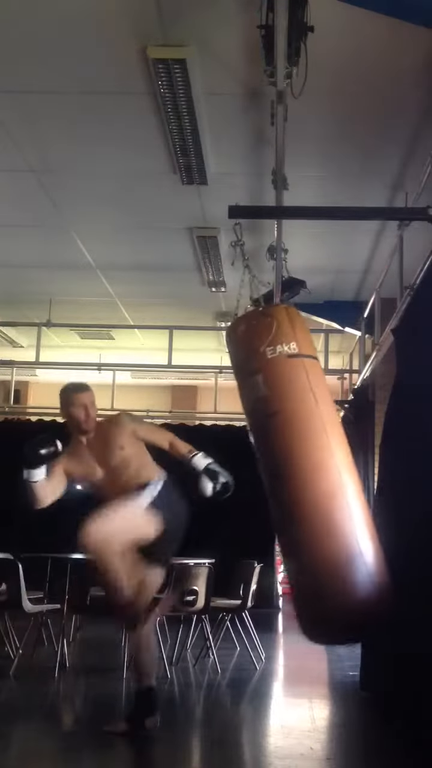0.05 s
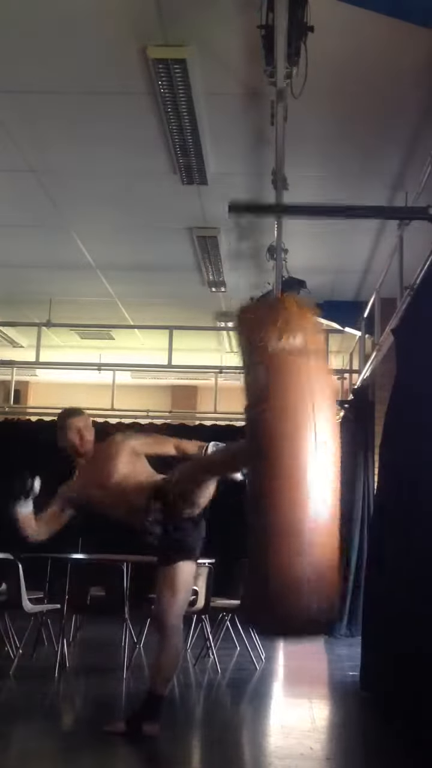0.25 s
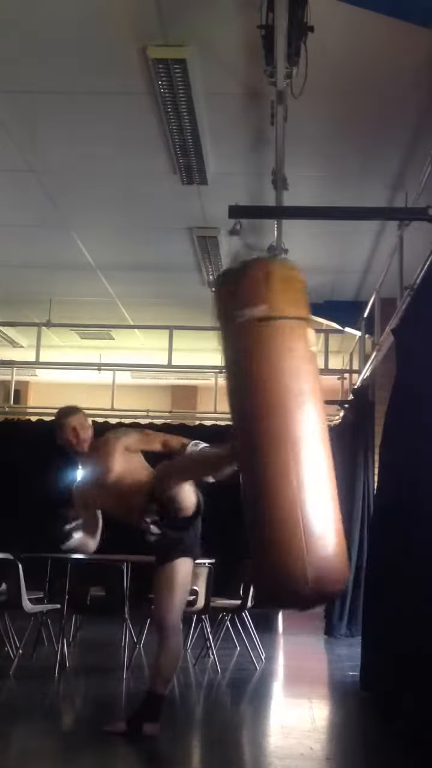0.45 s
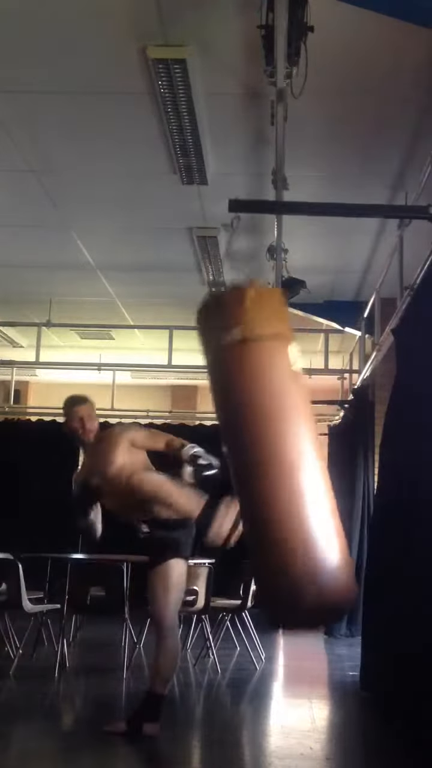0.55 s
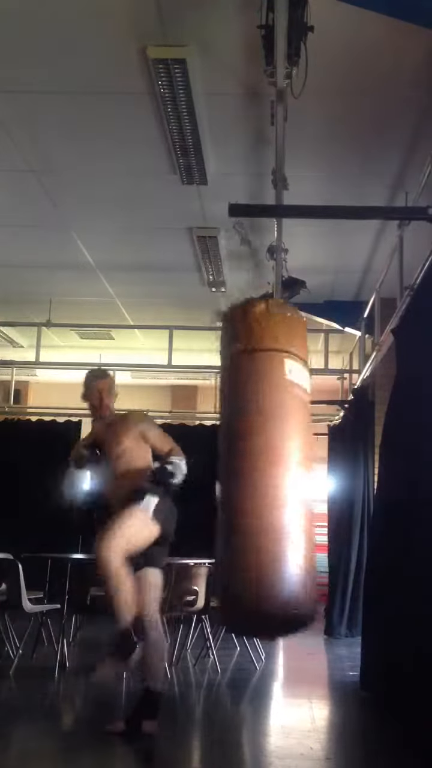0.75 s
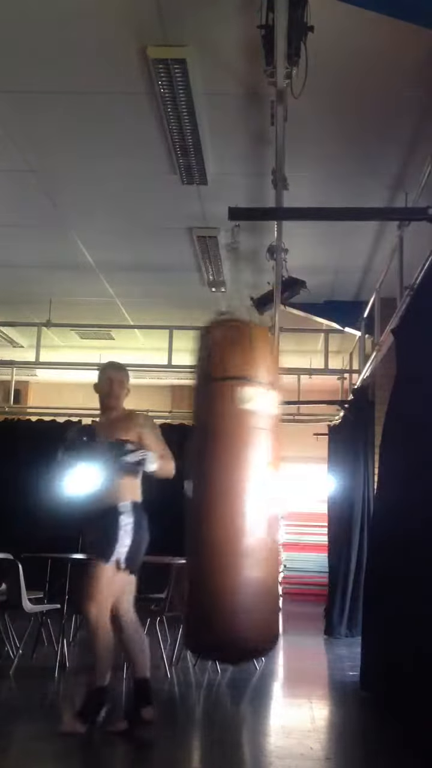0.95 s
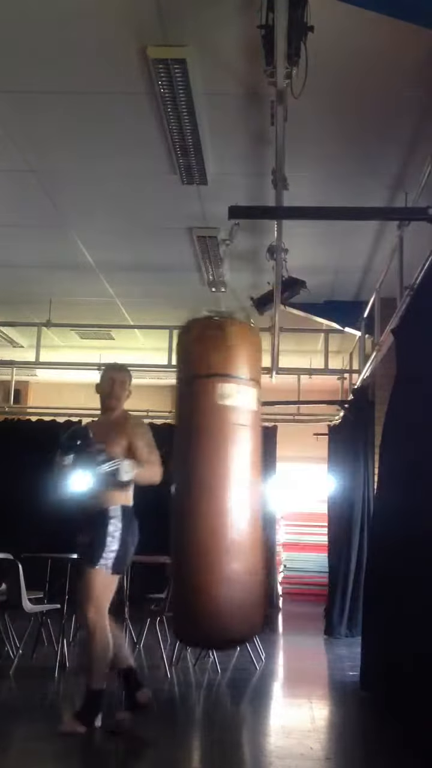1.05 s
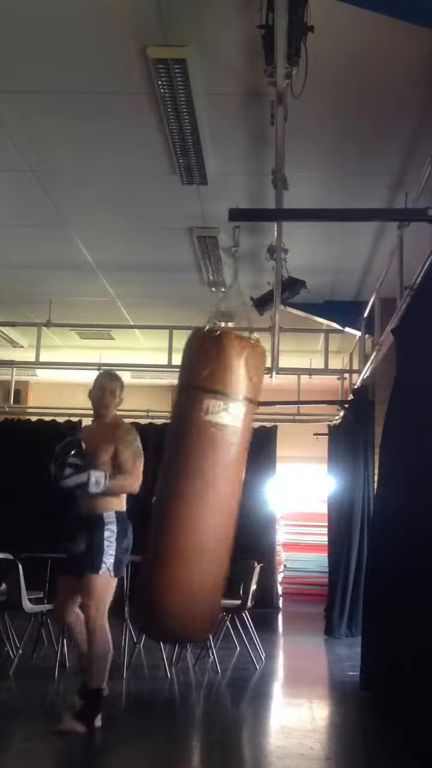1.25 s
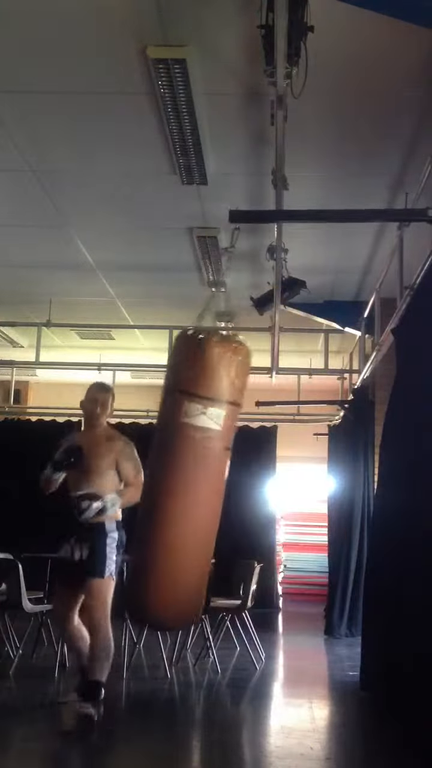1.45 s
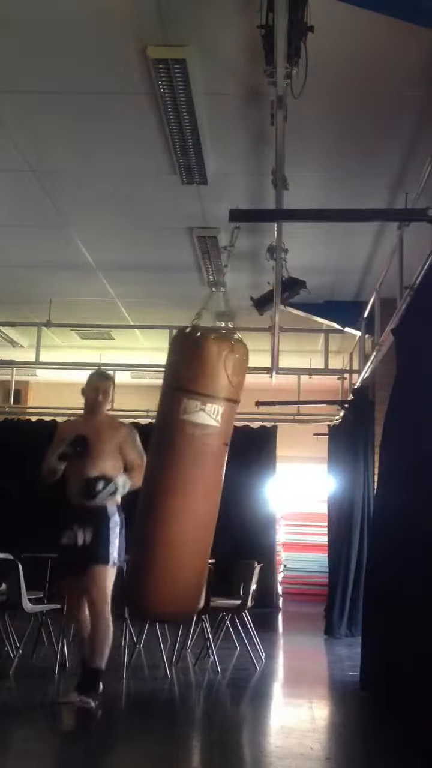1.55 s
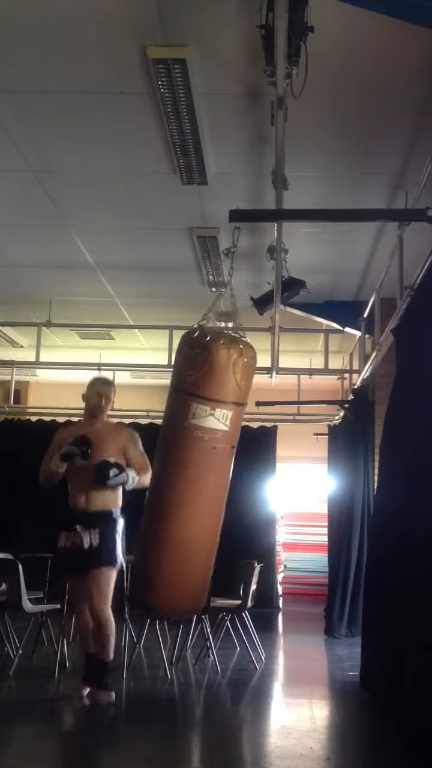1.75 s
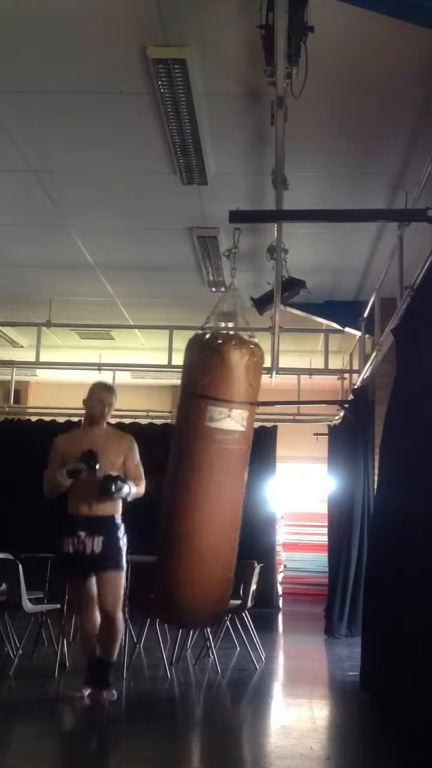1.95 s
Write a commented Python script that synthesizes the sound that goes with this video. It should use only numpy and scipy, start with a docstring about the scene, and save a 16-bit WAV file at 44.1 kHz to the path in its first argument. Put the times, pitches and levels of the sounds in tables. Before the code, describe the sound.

A heavy punching bag is kicked once at about 0.2 seconds, a leather slap with a short, low boom. Its chain clashes brightly right after, and again around 0.6 seconds with dull tugs as the bag drops back. Weaker rattles, ringing links and faint swivel squeaks follow until about 2 seconds. A low ventilation hum runs underneath in the large, quiet hall.

```python
"""One kick on a heavy bag

In a large, quiet hall with a low ventilation hum, a shin slaps the leather and the hanging bag booms.
The bag jumps and drops back onto its mount: the straps tug, the chain clashes and links snap taut.
As it swings on, the chain jerks more and more weakly, loose links ring and the swivel squeaks.
Slap, tugs and clashes are dense ticks, filtered; boom and rings are dying sines; squeaks are narrow noise."""
import sys
import numpy as np
from scipy import signal
from scipy.fft import rfft, irfft
from scipy.io import wavfile
from scipy.ndimage import uniform_filter1d

SR = 44100
rng = np.random.default_rng(int(sys.argv[2]) if len(sys.argv) > 2 else 0)


def persist_wave(psi):
    """Save psi, clipped to +-1, as 16-bit WAV."""
    counts = np.round(np.clip(psi, -1, 1) * 32767).astype(np.int16)
    wavfile.write(sys.argv[1], SR, np.atleast_2d(counts).T)


N = 88200
T = np.arange(N) / SR

# EQ curves for the air, the shin on leather, the straps, the chain's clash and jingle, and the mount.
# Each row: frequency in Hz, relative gain in dB.
AIR_EQ = [(25, -44), (55, -52), (85, -21), (125, -4), (170, -4.5), (215, -5.5), (330, -6.5), (500, -9.5),
          (700, -19), (1500, -26), (4000, -25), (8000, -24), (15000, -31.5)]
SLAP_EQ = [(25, 4), (70, -22), (150, 1), (280, 0), (480, 1.5), (700, -2), (1300, -9), (2000, -15),
           (4000, -12.5), (8000, -21), (15000, -27)]
STRAP_EQ = [(45, -52), (100, -31), (150, 2.5), (230, 4), (450, 0), (620, -8), (1200, -12.5), (4000, -63)]
CLASH_EQ = [(60, -83), (300, -29), (1500, -37.5), (2200, -10), (2800, -1), (3500, -6), (4300, 2), (5100, 2),
            (6200, -2.5), (8200, -2.5), (9500, -6.5), (12000, -15.5), (15000, -5)]
JINGLE_EQ = [(100, -38), (2000, -15.5), (6000, -36), (8000, -2), (9400, -12), (11200, 7.5), (12800, 5),
             (13800, -17), (14550, 9.5), (15100, 3)]
MOUNT_EQ = [(50, -42), (120, -9), (250, -2.5), (450, 2), (800, -4.5), (1150, -0.5), (1550, -6),
            (2100, -3.5), (4000, -4.5), (10000, -45)]
# Resonances of the bag, the swivel hook and the links.
# Each row: pitch in Hz, relative level in dB, seconds to fall 60 dB.
BAG_MODES = [(156.8, -26, 0.64), (249, -46, 0.11), (446, -32, 0.09), (640, -31, .07)]
HOOK_MODES = [(1850, -13, .15), (2853, -7, .5), (3914, -5, .17), (4237, -1.5, .32), (4325, 1.5, .2),
              (4560, 1, .2), (4660, -3, .26), (4775, 2, .13), (4900, 1, .19), (5340, -8, .4),
              (5660, -5, .1), (6500, -6, .12)]
LINK_MODES = [(8595, -1, .16), (9972, -4, .22), (10950, 0, .12), (11050, 0, .06), (11515, -.5, .3),
              (14555, 4, .24), (14610, 0, .08)]
# Jerks of the chain. Each row: start and hold in seconds, then clash, jingle and mount knock in dB.
CHAIN_JERKS = [(0.241, 0.035, -30, -35, -51), (0.275, 0.032, -19, -26.5, -33),
               (0.304, 0.011, -16.5, -24, -30), (0.321, 0.021, -38, -19, -38), (0.365, 0.06, -39, -37, -39),
               (0.433, 0.16, -58, -54, -45.5),          (0.544, 0.015, -37.5, -38, -41),
               (0.563, 0.024, -32, -34, -39.5), (0.592, 0.014, -27, -44, -37.5),
               (0.615, 0.029, -32.5, -32, -46), (0.649, 0.0097, -20.5, -43, -35),
               (0.662, 0.02, -19, -30, -34.5), (0.703, 0.005, -31, -23, -29.5),
               (0.728, 0.015, -28, -27, -38), (0.766, 0.11, -47.5, -37, -87),
               (0.91, 0.034, -36.5, -32.5, -50), (0.942, 0.025, -32.5, -30.5, -38),
               (0.985, 0.034, -42.5, -59, -44), (1.063, 0.014, -47, -38, -52.5),
               (1.196, 0.021, -37.5, -38, -43), (1.212, 0.027, -33.5, -32.5, -40),
               (1.249, 0.035, -31, -29.5, -41.5), (1.356, 0.065, -48, -47, -54.5),
               (1.429, 0.0098, -44, -34, -44), (1.445, 0.022, -33, -64, -40),
               (1.514, 0.0084, -30, -43, -37.5), (1.535, 0.016, -39, -43, -44),
               (1.614, 0.034, -45.5, -55, -52), (1.659, 0.017, -39, -52, -48),
               (1.715, 0.073, -47, -58.5, -48.5), (1.853, 0.017, -38.5, -50, -46.5),
               (1.873, 0.091, -48, -80, -52), (1.95, 0.0039, -41, -45, -45.5),
               (1.979, 0.032, -47.5, -62, -51)]
# The bag lands in its straps. Each row: start in seconds, hold in seconds, level in dB.
STRAP_TUGS = [(0.249, 0.019, -34.5), (0.322, 0.031, -38.5), (0.567, 0.043, -34), (0.621, 0.052, -36),
              (0.906, 0.123, -45.5), (1.223, 0.076, -47)]
# Two links snap taut. Each row: start in seconds, level in dB.
LINK_SNAPS = [(0.2533, -27), (0.2765, -18), (0.2865, -15.5), (0.6, -25), (0.667, -17), (1.267, -27),
              (1.517, -36), (1.947, -33)]
# Links swinging free. Each row: start in seconds, pitch in Hz, level in dB, seconds to fall 60 dB.
LINK_CLINKS = [(0.267, 2745, -15.5, 0.052), (.276, 4830, -10, 0.061), (.284, 4300, -16.5, 0.15),
               (0.287, 4060, -16, 0.1), (0.307, 11450, -29.5, 0.55), (0.288, 14555, -31, 0.36),
               (0.395, 14555, -31, 0.42), (0.423, 8530, -34, 0.43), (0.566, 14500, -28, 0.8),
               (.65, 4950, -10.5, 0.071), (0.659, 7187, -18, 0.12), (0.669, 5690, -10, 0.055),
               (0.75, 9970, -28.5, 0.16), (.78, 11535, -40, 0.7), (0.927, 8620, -24, 0.27),
               (0.941, 14460, -20, 0.13), (.95, 9975, -28, 0.21), (1.018, 8600, -30, 0.35),
               (1.062, 4255, -35, 0.12), (1.088, 8610, -24.5, 0.093), (1.109, 10955, -25.5, 0.073),
               (1.218, 4750, -29.5, 0.18), (1.222, 14560, -23, 0.28), (1.222, 9972, -27, 0.22),
               (1.264, 10940, -25, 0.14), (1.276, 4240, -35, 0.23), (1.313, 9970, -33, 0.41),
               (1.425, 8590, -31.5, 0.11), (1.62, 8600, -41, 0.42), (1.78, 8595, -43, 0.32),
               (1.943, 14560, -31, 0.1)]
# The swivel rubs. Each row: start and hold in seconds, pitch and bandwidth in Hz, level in dB.
SWIVEL_SQUEAKS = [(0.348, 0.14, 687, 205, -42), (0.37, 0.1, 517, 91, -45.5), (0.762, 1.4, 2863, 98, -55.5),
                  (1.553, 0.04, 1080, 70, -48.5), (1.736, 0.065, 1843, 52, -57)]
# The hall's reverb. Each row: frequency in Hz, seconds to fall 60 dB.
HALL_DECAY = [(125, 1), (500, 0.27), (1200, 0.7), (5000, 0.47), (9000, 0.58), (15000, 0.4)]

KICK_S = 0.2
ATTACK_S, RELEASE_S = 0.013, 0.015
BAG_SEND_DB, METAL_SEND_DB, CLINK_SEND_DB = -16, -7, -13


def amp(db):
    """Decibels to gain."""
    return 10 ** (np.asarray(db) / 20)


def unit(x):
    """Scales to rms 1."""
    return x / np.sqrt(np.mean(x ** 2) + 1e-20)


def curve_at(points, hz):
    """Reads a curve on a log-frequency axis."""
    f, value = np.transpose(points)
    return np.interp(np.log(hz + 1), np.log(f + 1), value)


def convolve(x, response):
    """Plays x through a response scaled to energy 1."""
    return signal.fftconvolve(x, response / np.linalg.norm(response))[:N]


def eq(x, curve, size=8192):
    """Minimum-phase EQ: nothing rings ahead of a hit."""
    hz = abs(np.fft.fftfreq(size, 1 / SR))
    log_gain = np.log(amp(curve_at(curve, hz)))
    spectrum = np.exp(np.conj(signal.hilbert(log_gain)))
    return convolve(x, np.fft.ifft(spectrum).real[:size // 2])


def narrow_noise(hz, width_hz):
    """One band of noise, rms 1."""
    f = np.fft.rfftfreq(N, 1 / SR)
    band = 1 / (1 + (2 * (f - hz) / width_hz) ** 4)
    return unit(irfft(rfft(rng.standard_normal(N)) * band, N))


def swell(start, hold):
    """Soft attack around the start, hold and exponential release."""
    rise = np.clip((T - start) / ATTACK_S + .5, 0, 1)
    release = np.exp(-np.maximum(T - start - hold, 0) / RELEASE_S)
    return np.sin(rise * np.pi / 2) ** 2 * release


def ring(start, hz, db, t60, rise_s=1 / SR):
    """One resonance: a dying sine."""
    age = np.maximum(T - start, 0)
    return np.minimum(age / rise_s, 1) * amp(db - 60 * age / t60) * np.sin(2 * np.pi * hz * age)


def contacts(per_second=4500, spread_db=2):
    """A dense crackle of uneven contact ticks, levelled to rms 1."""
    size = amp(spread_db * np.minimum(rng.exponential(1, N), 4))
    ticks = size * rng.choice([-1, 1], N) * (rng.random(N) < per_second / SR)
    local_power = abs(uniform_filter1d(ticks ** 2, size=700))
    return ticks / np.sqrt(local_power + 1e-6)


def ventilation(air_db=-50, hum_db=-51.5, hum_hz=168.3):
    """A bed of soft air noise and a wavering hum."""
    hum = np.sin(2 * np.pi * hum_hz * T) + 0.065 * narrow_noise(hum_hz, width_hz=110)
    air = eq(rng.standard_normal(N), AIR_EQ)
    return amp(air_db) * unit(air) + amp(hum_db) * unit(hum)


def leather_slap(level_db=-29.5, t60=0.22, crack_db=4.5, crack_s=0.0028):
    """Shin meets leather: a fast-dying burst with an extra crack on the front."""
    age = np.maximum(T - KICK_S, 0)
    envelope = (T >= KICK_S) * amp(level_db + crack_db * np.exp(-age / crack_s) - 60 * age / t60)
    return eq(contacts() * envelope, SLAP_EQ)


def bag_boom(choke_s=0.053):
    """The kicked bag rings low until the kicking leg damps it and chokes the boom."""
    boom = sum(ring(KICK_S, hz, db, t60, rise_s=0.0093) for hz, db, t60 in BAG_MODES)
    choke = np.exp(-np.maximum(T - KICK_S - choke_s, 0) / RELEASE_S)
    return boom * choke


def chain_jerks(hook_db=-12.5, links_db=-10):
    """Each jerk is a burst of link contacts that rings hook and links and knocks in the mount."""
    rows = np.array(CHAIN_JERKS)
    bursts = np.array([swell(start, hold) for start, hold in rows[:, :2]])
    # Three envelopes; overlapping jerks add in power.
    clash, jingle, knock = (np.sqrt(amp(db) ** 2 @ bursts ** 2) for db in rows[:, 2:].T)
    heavy, light = contacts(), contacts()
    rattle = eq(heavy * clash, CLASH_EQ) + eq(light * jingle, JINGLE_EQ)
    mount = eq(contacts() * knock, MOUNT_EQ)
    growth = 0.82  # dB of ring per dB of jerk: a taut chain damps itself
    hook = convolve(heavy * clash ** growth, sum(ring(0, *mode) for mode in HOOK_MODES))
    links = convolve(light * jingle ** growth, sum(ring(0, *mode) for mode in LINK_MODES))
    return rattle + mount + amp(hook_db) * hook + amp(links_db) * links


def strap_tugs():
    """Dull tugs as the straps take the bag's weight."""
    strain = sum(amp(db) * swell(start, hold) for start, hold, db in STRAP_TUGS)
    return eq(contacts() * strain, STRAP_EQ)


def link_snaps(modes=7, low_hz=3482, high_hz=12110, t60=0.029):
    """Links snap taut, and each hard contact rings its own handful of short, bright modes."""
    pitches = rng.uniform(low_hz, high_hz, (len(LINK_SNAPS), modes))
    snaps = sum(ring(start, hz, db, t60)
                for (start, db), cluster in zip(LINK_SNAPS, pitches) for hz in cluster)
    return snaps / np.sqrt(modes)


def link_clinks(flutter_db=3):
    """Loose links ring on at one of their high modes, fluttering as they tumble."""
    clinks = np.zeros(N)
    for start, hz, db, t60 in LINK_CLINKS:
        flutter = amp(flutter_db * narrow_noise(0, width_hz=70))
        clinks += ring(start, hz, db, t60, rise_s=0.009) * flutter
    return clinks


def swivel_squeaks():
    """Metal rubs in the swivel: short, rough squeaks and one long, faint one."""
    return sum(amp(db) * swell(start, hold) * narrow_noise(hz, width)
               for start, hold, hz, width, db in SWIVEL_SQUEAKS)


def hall_reverb(send, fade_in_s=0.0088):
    """The hall answers with a diffuse tail, each band dying at its own speed."""
    hz, t, noise = signal.stft(rng.standard_normal(N), SR, nperseg=256)
    decay = amp(-60 * t / curve_at(HALL_DECAY, hz)[:, None])
    tail = signal.istft(noise * decay, SR, nperseg=256)[1][:N]
    return convolve(send, tail * np.minimum(T / fade_in_s, 1))


def scene():
    """Bag and hardware in the hall, the same in both channels."""
    bag = leather_slap() + bag_boom() + strap_tugs()
    metal = chain_jerks() + swivel_squeaks() + link_snaps()
    clinks = link_clinks()
    send = amp(BAG_SEND_DB) * bag + amp(METAL_SEND_DB) * metal + amp(CLINK_SEND_DB) * clinks
    mono = bag + metal + clinks + hall_reverb(send) + ventilation()
    return np.array([mono, mono])


def record(dry, low_cut_hz=75, high_cut_hz=15250):
    """The microphone's bass roll-off, then a steep cut of the very top."""
    low_cut = signal.butter(2, low_cut_hz, "high", fs=SR, output="sos")
    high_cut = signal.firwin(401, high_cut_hz, window=("kaiser", 8), fs=SR)
    return signal.oaconvolve(signal.sosfilt(low_cut, dry), high_cut[None], "same")


dry = scene()
out = record(dry)
persist_wave(out)
```